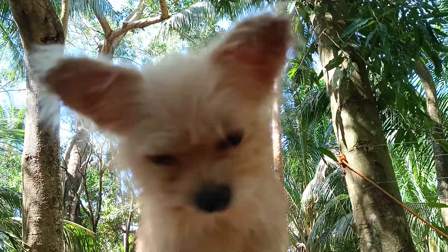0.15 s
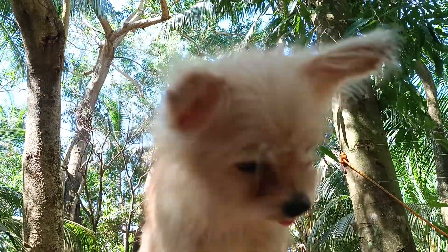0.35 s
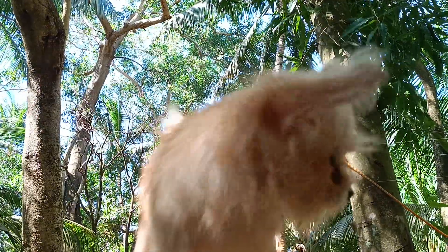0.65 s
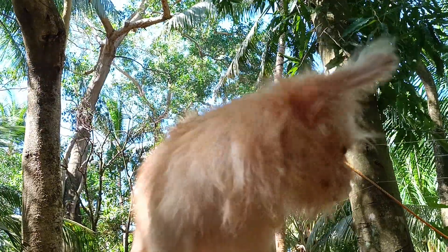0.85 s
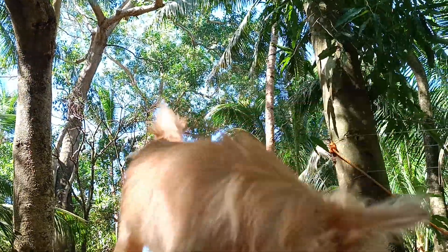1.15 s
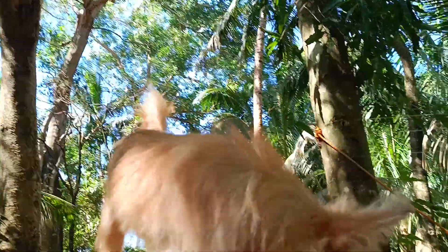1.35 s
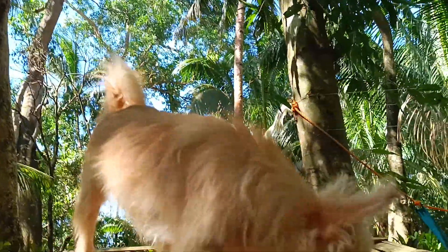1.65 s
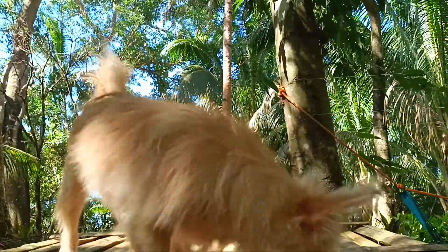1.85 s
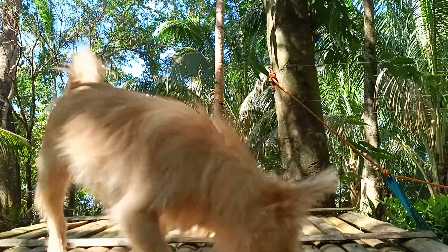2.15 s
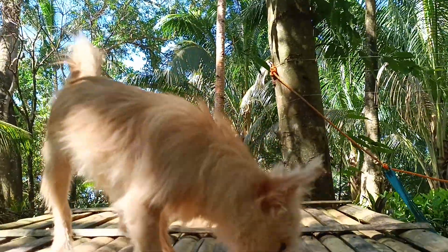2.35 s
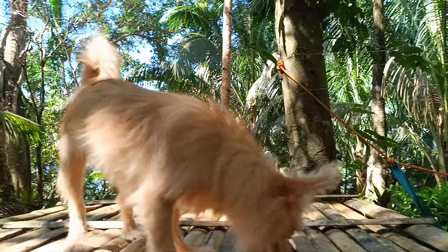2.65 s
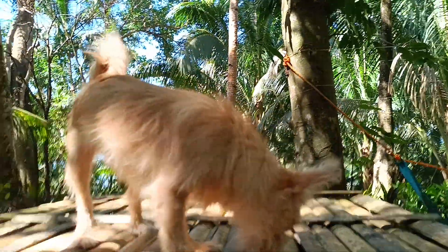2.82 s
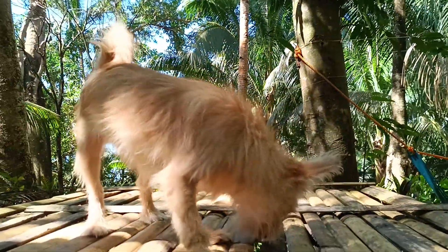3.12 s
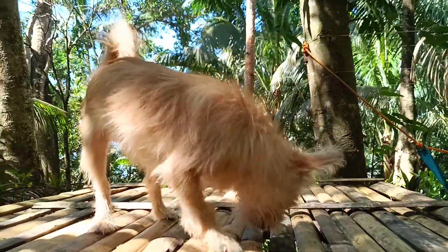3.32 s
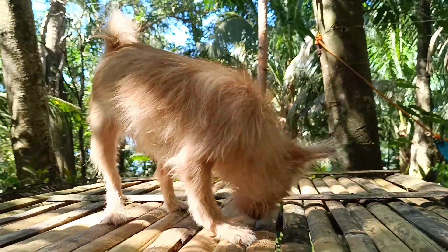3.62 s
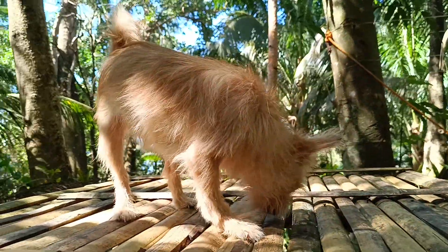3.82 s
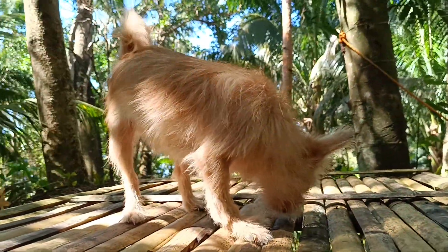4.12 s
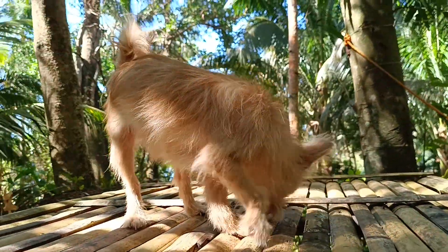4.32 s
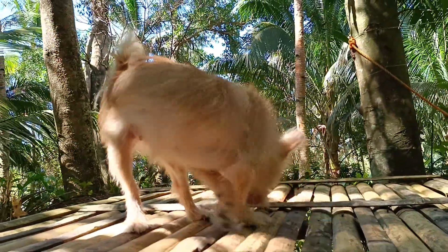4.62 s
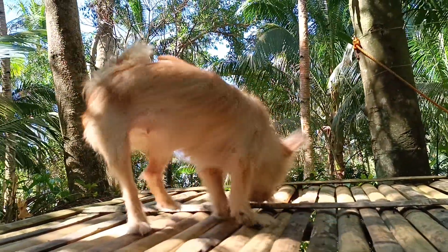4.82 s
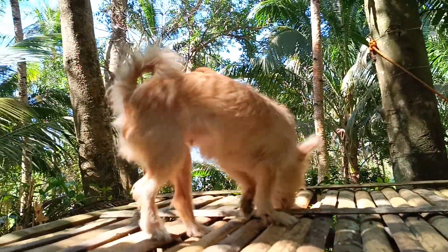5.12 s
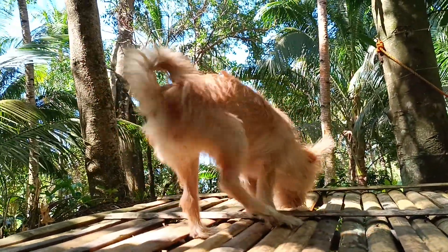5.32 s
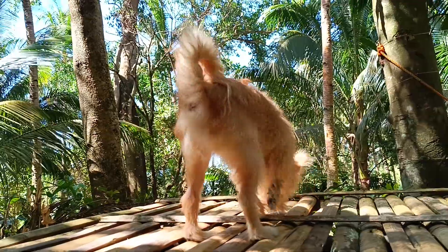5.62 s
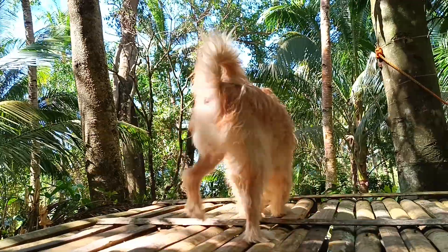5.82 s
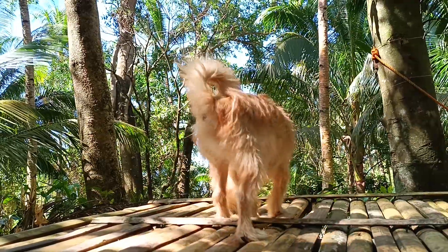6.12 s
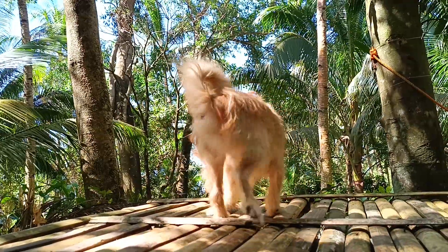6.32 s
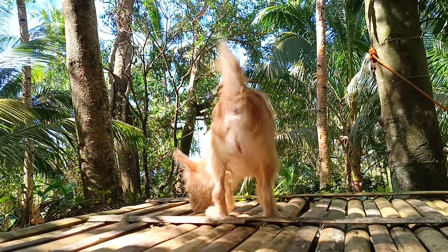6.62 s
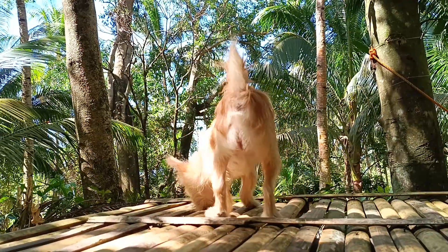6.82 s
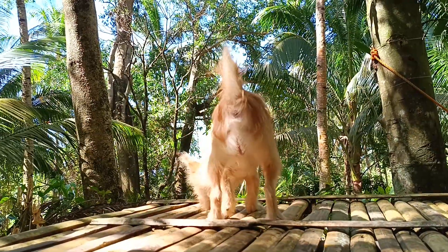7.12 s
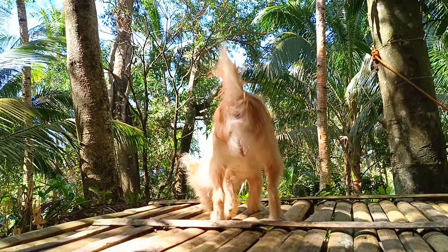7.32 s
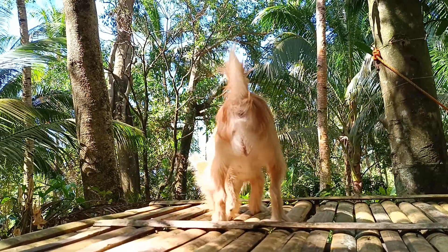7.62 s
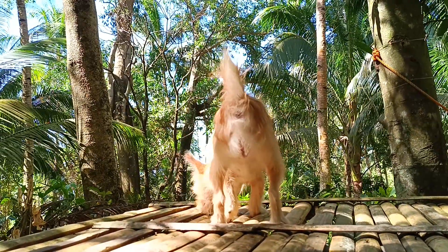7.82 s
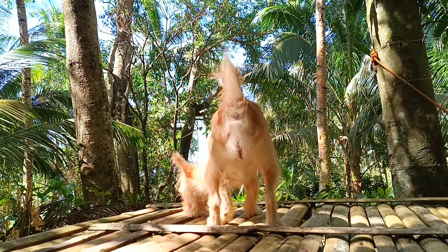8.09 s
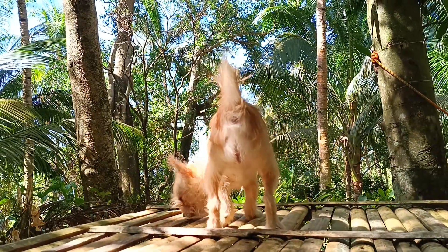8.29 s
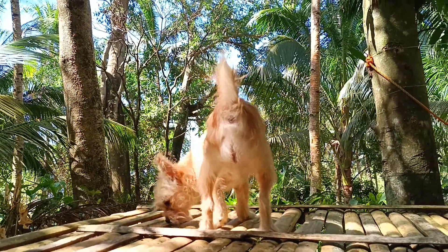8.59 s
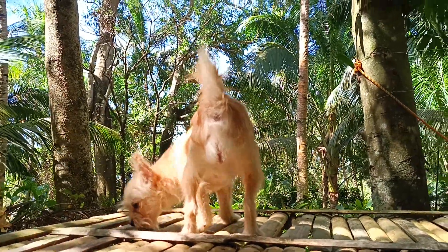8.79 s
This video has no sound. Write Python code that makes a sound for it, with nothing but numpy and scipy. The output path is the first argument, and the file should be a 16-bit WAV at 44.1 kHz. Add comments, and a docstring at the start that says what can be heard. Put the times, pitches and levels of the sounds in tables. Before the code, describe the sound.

A small dog's claws tick, scrape and crackle on a bamboo platform while thin birds whistle faintly over a quiet leafy hush.

```python
"""A bamboo grove: small dogs potter about on a slatted platform, in a steady outdoor hush with leaf rustle.
Claws tick, scrape and crackle as noise bursts coloured by narrow slat resonances; fur and pads rub softly.
Loose slats knock as damped sines; a dog snuffs in band-shaped noise; a hand-held camera rumbles when gripped.
Birds whistle as gliding sines with echoes, insects rasp in narrow noise bands, and faint far tones hum."""
import sys
import numpy as np
from scipy import signal
from scipy.fft import rfft, irfft, next_fast_len
from scipy.io import wavfile
from scipy.ndimage import map_coordinates

SR = 44100
rng = np.random.default_rng(int(sys.argv[2]) if len(sys.argv) > 2 else 0)


def file_out(sig):
    """Save sig as 16-bit WAV at sys.argv[1]."""
    # one column per channel
    cols = np.atleast_2d(sig).T
    # limit, then scale
    lim = np.clip(cols, -1, 1)
    pcm = np.round(lim * 32767).astype(np.int16)
    wavfile.write(sys.argv[1], SR, pcm)


N = 394674  # samples


# claw contacts: start_s [s], level_db [dB, before the common trim], pitch_hz [Hz, favoured]
CLAW_TICKS = [(.1361, -36, 9500), (.3777, -39, 4930), (1.055, -35, 5540), (1.073, -23.5, 8700),
              (1.4554, -33, 8330), (1.495, -30, 8850), (1.7623, -32, 8150), (1.8325, -17, 8710),
              (1.8416, -22, 8200), (1.88, -30, 7500), (1.9528, -23.5, 8560), (2.075, -20, 8300),
              (2.2411, -25.5, 8260), (2.3028, -14.5, 9060), (2.3165, -21.5, 6200), (2.322, -27.5, 8110),
              (2.4895, -22, 5300), (2.8224, -29, 5000), (2.874, -35, 4500), (3.039, -37, 4500),
              (3.3553, -22.5, 5160), (3.3845, -29.5, 6400), (4.3554, -33, 3160), (4.377, -29.5, 8460),
              (4.6059, -26, 3270), (4.6142, -29.5, 2530), (4.6402, -26, 4470), (4.68, -11, 9580),
              (4.6928, -11, 9100), (4.8092, -14, 8200), (5.013, -14.5, 8200), (5.189, -23, 8720),
              (5.197, -24, 8720), (5.2915, -30, 4320), (5.4899, -35, 8290), (5.5736, -33, 8200),
              (5.7443, -29.5, 2770), (6.102, -28.5, 4260), (6.2662, -30, 4260), (6.3934, -34, 7880),
              (6.9065, -20, 5430), (7.0397, -28, 6560)]
# left-right place of the paws: time_s [s], left_minus_right_db [dB]
PAW_SIDE_DB = [(0, -4), (1.8, -4), (2.3, -4.5), (2.9, -3), (3.3, 1), (4.65, 2), (5.1, 6.5), (6.2, 2),
               (7, 3.5), (8.7, 0)]
TICK_T60_S, TICK_DOUBLING_DB = .014, 24  # ring of a -20 dB tick; dB more that double the ring time


def ticks(focus_db=5, focus_octaves=0.51, trim_db=-4.5, thin_db_per_octave=2.3):
    """Impact excitation: a claw on hard bamboo gives a brief crack, a short ring and a faint slat rattle."""
    out, t = np.zeros((2, N)), np.arange(SR // 8) / SR
    rattle = amp(-25 - 60 * t / .08)
    bite = np.minimum(t / .0005, 1)
    crack = amp(-1 - 60 * t / .005)
    for start_s, level_db, pitch_hz in CLAW_TICKS:
        t60 = TICK_T60_S * 2 ** ((level_db + 20) / TICK_DOUBLING_DB)
        decay = bite * (crack + amp(-2 - 60 * t / t60) + rattle)
        contact = pair(len(t), spread=.8) * decay * amp(4.1 * wobble(1200, len(t)))

        def colour(hz):
            # a sharp contact favours its own pitch and barely moves the slat far below it
            octaves_away = np.log2((hz + 1) / pitch_hz)
            focus = focus_db * np.exp(-(octaves_away / focus_octaves) ** 2)
            thinning = thin_db_per_octave * np.log2(pitch_hz / np.clip(hz, 500, pitch_hz))
            return spot(hz) + focus - thinning

        tick = unit(struck(contact, colour)) * np.sqrt(np.mean(decay ** 2))
        add(out, start_s, amp(level_db + trim_db) * tick, curve(PAW_SIDE_DB, start_s))
    return out


# claw scrapes: start_s [s], rise_s [s], fade_s [s per 20 dB], level_db [dB], tilt_db [dB per octave]
CLAW_SCRAPES = [(1.797, .011, .03, -43, 2), (1.953, .014, .048, -28, 2.2), (1.981, .015, .034, -35.5, 2.5),
                (2.0725, .002, .018, -28.5, 3), (2.49, .002, .04, -42.5, -2),
                (4.625, .046, .03, -35.5, -2.5), (4.668, .012, .04, -26, .5),
                (4.684, .009, .025, -21.5, 1.5), (4.809, .002, .019, -23.5, -.3),
                (4.946, .009, .012, -33, -.5), (4.969, .006, .012, -40, -.5),
                (5.0105, .003, .032, -27.5, -.6), (5.048, .007, .016, -40, -2), (5.15, .03, .02, -48, 0),
                (5.185, .011, .008, -33, 1), (5.29, .004, .008, -39, -.5), (5.52, .035, .03, -39.5, -1.5),
                (5.862, .009, .07, -48.5, -3.5), (6.101, .002, .05, -44, -3.5), (6.52, .22, .35, -53, -2.5),
                (6.906, .001, .02, -34, 0), (7.031, .0045, .042, -46, -1.5), (8.677, .004, .045, -45, -4),
                (8.85, .082, .1, -42.5, -.5)]
# soft shuffles of the pads: start_s [s], level_db [dB]
PAD_SHUFFLES = [(.165, -53), (.675, -53.5), (.78, -52.5), (1.002, -49.5), (1.19, -52), (1.494, -50),
                (1.721, -53), (2.143, -55), (2.8, -49.5), (3.225, -50), (3.352, -50), (6.135, -48.5),
                (6.27, -50), (7.309, -49.5), (7.48, -54), (8.38, -58), (8.805, -53)]
SHUFFLE_RISE_S, SHUFFLE_FADE_S, SHUFFLE_TILT_DB = .012, .15, -1.8  # fade per 20 dB, tilt per octave


def scuffs():
    """Sliding friction: claws scrape in strokes of varied shape; pads shuffle in strokes of one shape."""
    out = np.zeros((2, N))
    for start_s, rise_s, fade_s, level_db, tilt_db in CLAW_SCRAPES:
        stroke = amp(level_db) * drag(rise_s, fade_s, tilt_db)
        add(out, start_s, stroke, curve(PAW_SIDE_DB, start_s))
    for start_s, level_db in PAD_SHUFFLES:
        stroke = amp(level_db) * drag(SHUFFLE_RISE_S, SHUFFLE_FADE_S, SHUFFLE_TILT_DB)
        add(out, start_s, stroke, curve(PAW_SIDE_DB, start_s))
    return out


def drag(rise_s, fade_s, tilt_db, grain_db=3.5, slip_db=1.5):
    """Stick-slip friction: one stroke over the fibres catches and slips in dense uneven grains."""
    t = np.arange(0, rise_s + 2 * fade_s, 1 / SR)
    stroke = np.minimum((t / rise_s) ** 2, amp(-20 * (t - rise_s) / fade_s))
    unevenness = amp(grain_db * wobble(1500, len(t)) + slip_db * wobble(300, len(t)))
    grains = pair(len(t), spread=0.83) * unevenness
    scrape = struck(grains * stroke, lambda hz: spot(hz) + tilt_db * np.log2(np.maximum(hz, 500) / 5000))
    return unit(scrape) * np.sqrt(np.mean(stroke ** 2))


# how busily the dogs shift their feet: time_s [s], activity_db [dB, before each layer's trim]
FOOT_ACTIVITY = [(0, -55), (1.3, -57), (1.8, -47), (2.3, -53), (2.65, -60), (2.9, -49), (3.4, -51),
                 (3.85, -62), (4.4, -53), (4.7, -45), (5.25, -41), (5.6, -47), (6, -55), (6.3, -46),
                 (6.85, -45), (7.9, -66), (8.6, -59), (8.95, -46)]
# spectral shape of a claw on bamboo: frequency_hz [Hz], gain_db [dB]
CLAW_SPECTRUM = [(300, -27), (900, -16), (1400, -11.5), (2000, -6.5), (3200, -4.5), (4400, -3),
                 (5500, -2.5), (7000, -5.5), (8400, -2), (9300, -1), (10500, -10.5), (12500, -18),
                 (14500, -22), (15800, -24)]


def crackles(rate_hz=38, scatter_db=3.5, tilt_db=-1.5, trim_db=-2):
    """Poisson impulses: grit and dry fibres snap at random under the shifting paws."""
    times = np.cumsum(rng.exponential(1 / rate_hz, 1000))
    times = times[times < N / SR]
    scatter = scatter_db * np.clip(rng.standard_normal(len(times)), -2, 2)
    sizes = amp(curve(FOOT_ACTIVITY, times) + trim_db + scatter)
    snaps = np.bincount((times * SR).astype(int), sizes, N)
    # each snap decays with a half-millisecond time constant
    bursts = signal.lfilter([1], [1, -np.exp(-1 / (.0005 * SR))], snaps)

    def colour(hz):
        return along(CLAW_SPECTRUM, hz) + tilt_db * np.log2(np.maximum(hz, 500) / 5000)

    return struck(pair(N, spread=.8) * bursts, colour)


def spot(hz, ripple_db=3):
    """Local mechanical response: each spot of bamboo colours a contact in its own random way."""
    knots = np.arange(0, SR, 260)
    ripple = np.interp(hz, knots, rng.standard_normal(len(knots)))
    return along(CLAW_SPECTRUM, hz) + ripple_db * ripple


# bamboo resonances: frequency_hz [Hz], width_hz [Hz], gain_db [dB]
SLAT_MODES = [(1950, 90, -3), (3000, 70, -9), (4160, 80, -5), (5890, 140, -12), (7790, 110, -9),
              (8310, 75, -2), (8650, 140, -8), (8900, 60, -5), (9060, 60, -4), (9440, 60, -5),
              (9980, 60, -8), (11640, 70, -5)]


def slats(contacts):
    """Modal resonance: narrow band-pass modes of the slats add to every direct contact."""
    def ring(f):
        return sum(amp(gain_db) * 1j * f * width / (hz * hz - f * f + 1j * f * width)
                   for hz, width, gain_db in SLAT_MODES)

    return filtered(contacts, lambda f: 1 + ring(f))


# spectral shape of fur and pads rubbing: frequency_hz [Hz], gain_db [dB]
RUB_SPECTRUM = [(100, -12), (250, 2), (700, 0), (1500, -5), (4500, -7), (9000, -7), (12000, -22),
                (15800, -28)]


def rubbing(trim_db=-13, grain_db=2.5, uneven_db=2.5):
    """Broadband friction: fur and pads rub on the platform as loudly as the feet are active."""
    grains = unit(amp(grain_db * wobble(600, N) + uneven_db * wobble(12, N)))
    # half the sideways lean of the claws
    sides = amp(np.outer([.5, -.5], curve(PAW_SIDE_DB)) / 2)
    return amp(curve(FOOT_ACTIVITY) + trim_db) * sides * grains * rush(RUB_SPECTRUM, pan_db=0)


# dull knocks of slats and camera: start_s [s], level_db [dB, peak of the ring], pitch_hz [Hz]
DULL_KNOCKS = [(.378, -42, 1480), (2.55, -48, 94), (2.822, -41, 550), (2.847, -44, 247), (2.874, -39, 330),
               (2.988, -41, 118), (3.039, -43, 495), (3.175, -34.5, 2320), (3.276, -27, 160),
               (3.282, -35, 92), (3.9, -47, 115), (4.731, -34, 2186), (5.058, -41, 550), (5.744, -32, 2620),
               (5.871, -42, 1040), (8.379, -29.5, 1200), (8.677, -41, 905), (8.684, -36.5, 445),
               (8.707, -30.5, 1313), (8.719, -37, 2400)]
KNOCK_T60_S, KNOCK_DAMPING = .008, .68  # ring time at 1 kHz; it falls as this power of the pitch


def knocks(rattle_rad=.5, click_db=-10):
    """Damped oscillation: a blunt push rings one rattling mode; higher knocks die sooner and click more."""
    out, t = np.zeros((2, N)), np.arange(SR // 8) / SR
    for start_s, level_db, hz in DULL_KNOCKS:
        t60 = KNOCK_T60_S * (1000 / hz) ** KNOCK_DAMPING
        jitter = np.array([wobble(2 * hz, len(t)), wobble(2 * hz, len(t))])
        phase = 2 * np.pi * hz * t + rattle_rad * jitter
        ring = np.sin(phase) * amp(-60 * t / t60) * (1 - np.exp(-2 * hz * t))
        burst = pair(len(t), spread=.6) * amp(-60 * t / .007)
        click = struck(burst, lambda f: along([(1800, 6), (4000, -2), (9000, -10), (15000, -22)], f))
        hardness = np.clip((hz - 170) / 300, 0, 1)
        knock = ring / np.abs(ring).max() + hardness * amp(click_db) * click
        # low knocks lean right, higher ones sit in the middle
        add(out, start_s, amp(level_db) * knock, along([(150, -13), (600, 0)], hz))
    return out


# spectral shape of the puff of air: frequency_hz [Hz], gain_db [dB]
SNUFF_SPECTRUM = [(120, -35), (280, -7), (450, 0), (650, -3), (1050, -12), (1600, -28), (4000, -55)]


def snuff(start_s=7.316, level_db=-40.3, rise_s=.022):
    """Turbulent flow: a short hollow puff of air from a muzzle held against the slats."""
    out, t = np.zeros((2, N)), np.arange(SR // 2) / SR
    air = unit(filtered(pair(len(t), spread=0.445), lambda hz: amp(along(SNUFF_SPECTRUM, hz))))
    fade = amp(-60 * t / .5)
    add(out, start_s, amp(level_db) * air * (1 - np.exp(-t / rise_s)) * fade)
    return out


# spectral shape of the handling rumble: frequency_hz [Hz], gain_db [dB]
RUMBLE_SPECTRUM = [(20, -12), (45, -9), (80, 1), (140, 0), (200, -6), (320, -22), (700, -50)]
# shifts of the hand's grip: centre_s [s], level_db [dB]
GRIP_SHIFTS = [(2.5, -62), (2.88, -60), (3.06, -59), (3.23, -50), (3.86, -60), (4.05, -67)]
GRIP_SWELL_S = .075  # from the centre to 1/e


def handling():
    """Structure-borne noise: each shift of the hand on the camera body swells as a soft low rumble."""
    out, t = np.zeros((2, N)), np.arange(N) / SR
    rumble = unit(filtered(pair(N, spread=.8), lambda hz: amp(along(RUMBLE_SPECTRUM, hz))))
    pressure = sum(amp(level_db) * np.exp(-((t - centre_s) / GRIP_SWELL_S) ** 2)
                   for centre_s, level_db in GRIP_SHIFTS)
    add(out, 0, rumble * pressure, pan_db=-9)
    return out


# near bird: start_s [s], length_s [s], middle_hz [Hz], glide_hz [Hz per note],
# level_db [dB, before echoes], octave_db [dB, second harmonic over the fundamental]
BIRD_WHISTLES = [(0, .13, 6340, -280, -61, -30), (2.864, .22, 6520, -260, -59.5, -14),
                 (3.272, .19, 6380, 70, -57, -7), (3.626, .17, 6400, 150, -53.5, -12),
                 (3.96, .18, 6400, -260, -55, -3.5), (6.29, .05, 6370, -360, -57, -20),
                 (6.559, .19, 6390, -380, -52, -17), (6.966, .22, 6580, -200, -54.5, -9),
                 (7.433, .075, 6430, 220, -58, -17)]
# far bird: start_s [s], length_s [s], start_hz [Hz], target_hz [Hz], level_db [dB, before distance trims]
BIRD_SLURS = [(.249, .06, 5500, 4500, -62), (.35, .06, 5250, 4800, -58), (.399, .096, 5600, 5200, -62),
              (.511, .13, 5600, 4650, -59), (3.347, .12, 6400, 5800, -61), (3.599, .084, 4200, 5100, -55),
              (3.728, .09, 3950, 5100, -54.5), (3.925, .12, 6100, 6450, -60), (4.05, .08, 4150, 4270, -64),
              (4.14, .1, 5250, 4550, -57), (4.182, .075, 4600, 3700, -50.5),
              (4.285, .07, 3850, 3050, -53.5)]
ARCH_HZ_PER_S2 = 15000  # every whistle arches alike
SLUR_SETTLE = 2.3  # time constants per note: a slur moves fast at first, then nears its target


def birds():
    """Direct and scattered sound: a near thin whistler, and a far burry singer blurred by the trees."""
    near, far = np.zeros((2, 2, N))
    for start_s, length_s, middle_hz, glide_hz, level_db, octave_db in BIRD_WHISTLES:
        t = np.arange(-length_s / 2, length_s / 2, 1 / SR)
        hz = middle_hz + glide_hz * t / length_s - ARCH_HZ_PER_S2 * t ** 2
        whistle = note(hz, waver=.005, waver_rate=330, octave_db=octave_db)
        add(near, start_s, amp(level_db) * whistle, pan_db=4.5)
    for start_s, length_s, start_hz, target_hz, level_db in BIRD_SLURS:
        approach = np.exp(-SLUR_SETTLE * np.linspace(0, 1, int(length_s * SR)))
        hz = target_hz + (start_hz - target_hz) * approach
        add(far, start_s, amp(level_db) * note(hz, waver=.031, waver_rate=450, octave_db=-35))
    near_sound = near + amp(-5) * echoes(near, t60=.5)
    far_sound = amp(-5.5) * far + amp(.5) * echoes(far, t60=.6)
    return near_sound + far_sound


def note(hz, waver, waver_rate, octave_db):
    """Frequency modulation: a bird's note follows a pitch line with an unsteady throat."""
    size = len(hz)
    phase = 2 * np.pi * np.cumsum(hz * (1 + waver * wobble(waver_rate, size))) / SR
    tone = np.sin(phase) + amp(octave_db) * np.sin(2 * phase)
    return unit(tone * swell(np.linspace(0, 1, size)) * amp(3 * wobble(50, size)))


# spectral shape of the bush cricket: frequency_hz [Hz], gain_db [dB]
BUZZ_SPECTRUM = [(6500, -50), (7600, -4), (8500, 0), (9900, -4), (10300, -58)]
# spectral shape of the thinner insect: frequency_hz [Hz], gain_db [dB]
CHIRP_SPECTRUM = [(12500, -50), (13600, -6.5), (14000, 0.5), (14400, -10), (15200, -50)]
# thin insect chirps: start_s [s], level_db [dB]
THIN_CHIRPS = [(.5, -67), (1.42, -63), (4.19, -72), (5.24, -70), (6.11, -71), (7.65, -71), (8.46, -71)]
BUZZ_START_S, BUZZ_EVERY_S, BUZZ_LENGTH_S, BUZZ_DB = 4.44, .236, .14, -57
CHIRP_LENGTH_S = .09


def insects(count=6):
    """Stridulation: a bush cricket repeats its phrase evenly; a thinner insect chirps now and then."""
    out = np.zeros((2, N))
    for k in range(count):
        add(out, BUZZ_START_S + k * BUZZ_EVERY_S, amp(BUZZ_DB) * rasp(BUZZ_LENGTH_S, BUZZ_SPECTRUM))
    for start_s, level_db in THIN_CHIRPS:
        add(out, start_s, amp(level_db) * rasp(CHIRP_LENGTH_S, CHIRP_SPECTRUM))
    return out


def rasp(length_s, spectrum):
    """Band-limited friction noise: wings rasp one short phrase within a narrow high band."""
    u = np.linspace(0, 1, int(length_s * SR))
    band = filtered(pair(len(u), spread=0.93), lambda hz: amp(along(spectrum, hz)))
    return swell(u) * unit(band)


# spectral shape of the far hush: frequency_hz [Hz], gain_db [dB]
HUSH_SPECTRUM = [(22, -7), (45, -15), (70, -5), (105, -2.5), (170, -0.5), (240, -3), (340, -5.5),
                 (600, -6.5), (820, -6), (1000, -12.5), (1500, -21.5), (3000, -56)]
# slow course of the hush: time_s [s], level_db [dB, before the trim]
HUSH_COURSE = [(0.0, -61), (0.32, -62), (1.59, -62), (1.87, -61), (4.34, -63), (4.91, -59), (8.95, -61)]
# spectral shape of the leaf rustle: frequency_hz [Hz], gain_db [dB]
LEAF_SPECTRUM = [(590, -34), (1000, -4.5), (1280, -6.5), (1420, -5), (2050, -3.5), (2230, -2), (2530, -4.5),
                 (3710, -7), (4020, -6.5), (5570, -8.5), (6400, -14), (8260, -6), (11600, -19.5),
                 (13900, -23.5), (16000, -24)]
# the rustle moves over as the camera turns: time_s [s], left_minus_right_db [dB]
LEAF_SIDE_DB = [(0, -2), (2.7, -2), (3.4, 1), (8.95, 1.5)]


def grove(hush_trim_db=1.5, leaf_db=-58, crackle_db=1.5):
    """Diffuse noise field: a far low hush and the steady fine rustle of leaves."""
    hush_level = amp(curve(HUSH_COURSE) + hush_trim_db + 0.93 * wobble(9, N))
    hush = hush_level * rush(HUSH_SPECTRUM, pan_db=0.5)
    rustle = unit(amp(crackle_db * wobble(700, N) + 0.83 * wobble(14, N)))
    sides = amp(np.outer([.5, -.5], curve(LEAF_SIDE_DB)))
    return hush + amp(leaf_db) * sides * rustle * rush(LEAF_SPECTRUM, pan_db=0)


# faint far tones: frequency_hz [Hz, before drift], level_db [dB, before the swell]
HUM_TONES = [(409, -78), (521, -77), (615, -77.5), (736, -73)]
# rise and fall of the hum: time_s [s], gain_db [dB]
HUM_COURSE = [(0, -2), (1.7, -5), (2.3, 4), (3.2, -4), (5.7, 0), (8.95, -2)]


def hum(drift=.005):
    """Slow frequency and amplitude modulation: far steady tones waver together and come and go."""
    speed = 1 + drift * wobble(3, N) + drift * wobble(40, N)
    warped_time = np.cumsum(speed) / SR
    tones = sum(amp(level_db) * unit(np.sin(2 * np.pi * hz * warped_time) * amp(2.2 * wobble(6, N)))
                for hz, level_db in HUM_TONES)
    return tones * amp(curve(HUM_COURSE))


# likeness of left and right noise: frequency_hz [Hz], correlation [-1 to 1]
LEFT_RIGHT_LIKENESS = [(60, 0.47), (180, 0.67), (550, 0.37), (1650, -0.19), (4970, 0.089), (15000, -0.19)]


def rush(spectrum, pan_db):
    """Interchannel coherence: steady shaped noise of rms 1 with a set left-right likeness in each band."""
    def mid_side_gains(hz):
        turn = np.arccos(np.clip(along(LEFT_RIGHT_LIKENESS, hz), -1, 1)) / 2
        return amp(along(spectrum, hz)) * [np.cos(turn), np.sin(turn)]

    mid, side = filtered(rng.standard_normal((2, N)), mid_side_gains)
    return unit(np.array([mid + side, mid - side]) * amp([[pan_db / 2], [-pan_db / 2]]))


def echoes(x, t60):
    """Diffuse scattering: an exponentially decaying noise tail, different at each microphone."""
    t = np.arange(SR) / SR
    tail = rng.standard_normal((2, SR)) * amp(-60 * t / t60)
    return signal.fftconvolve(x, tail / np.linalg.norm(tail[0]), axes=1)[:, :N]


def struck(x, gain_db):
    """Minimum phase: causal colouring, so nothing sounds before the contact."""
    size = 1024
    cepstrum = irfft(np.log(amp(gain_db(np.fft.rfftfreq(size, 1 / SR)))))
    # fold the cepstrum onto positive time
    cepstrum[1:size // 2] *= 2
    cepstrum[size // 2 + 1:] = 0
    impulse = irfft(np.exp(rfft(cepstrum)))
    return signal.fftconvolve(x, impulse[None], axes=1)[:, :x.shape[1]]


def filtered(x, response):
    """Linear filtering: multiply the spectrum of x by a response of frequency."""
    n = x.shape[-1]
    m = next_fast_len(n + 4096)
    return irfft(rfft(x, m) * response(np.fft.rfftfreq(m, 1 / SR)), m)[..., :n]


def pair(size, spread):
    """Mid-side stereo: white noise at two microphones; spread is side over mid."""
    mid, side = rng.standard_normal((2, size))
    return unit(np.array([mid + spread * side, mid - spread * side]))


def add(track, start_s, sound, pan_db=0):
    """Superposition with level panning: mix a sound in, leaning left by pan_db."""
    start = max(round(start_s * SR), 0)
    sides = amp([[pan_db / 2], [-pan_db / 2]])
    part = (sound * sides / np.sqrt(np.mean(sides ** 2)))[:, :max(N - start, 0)]
    track[:, start:start + part.shape[1]] += part


def wobble(rate, size):
    """Band-limited modulation: a smooth random curve with rate knots a second."""
    knots = rng.standard_normal(int(size * rate / SR) + 4)
    return map_coordinates(knots, [np.arange(size) * rate / SR])


def swell(u):
    """Amplitude envelope: a rounded rise and fall over u = 0..1."""
    return np.sqrt(np.abs(np.sin(np.pi * u)))


def along(points, hz):
    """Logarithmic frequency scale: read (Hz, value) points on a log axis."""
    f, v = np.transpose(points)
    return np.interp(np.log(hz + 1), np.log(f + 1), v)


def curve(points, s=None):
    """Linear interpolation: read (s, value) points at time s, or at every sample."""
    return np.interp(np.arange(N) / SR if s is None else s, *np.transpose(points))


def amp(db):
    """Level to amplitude: decibels to gain."""
    return 10 ** (np.asarray(db) / 20)


def unit(x):
    """Root mean square: scale to rms 1."""
    return x / np.sqrt(np.mean(x ** 2) + 1e-20)


# left-right tilt of the claw contacts: frequency_hz [Hz], left_minus_right_db [dB]
CONTACT_BALANCE = [(1000, 0), (4000, 1.5), (6500, .5), (8500, -1), (12000, -2)]


def scene():
    """Superposition of near and far fields: paws close by and almost dry, the grove all around."""
    contacts = slats(ticks() + scuffs() + crackles())
    balanced = filtered(contacts, lambda hz: amp(np.outer([.5, -.5], along(CONTACT_BALANCE, hz))))
    paws = balanced + knocks()
    scatter = amp(-22) * echoes(paws, t60=.2)
    near = paws + scatter + rubbing() + snuff() + handling()
    return near + birds() + insects() + grove() + hum()


TOP_HZ = 15900  # band limit


def record(dry, low_cut_hz=55):
    """Band limitation: the camera thins the deep bass and keeps nothing above its band limit."""
    return filtered(dry, lambda hz: (hz < TOP_HZ) * (1j * hz / (low_cut_hz + 1j * hz)) ** 2)


dry = scene()
out = record(dry)
file_out(out)
```